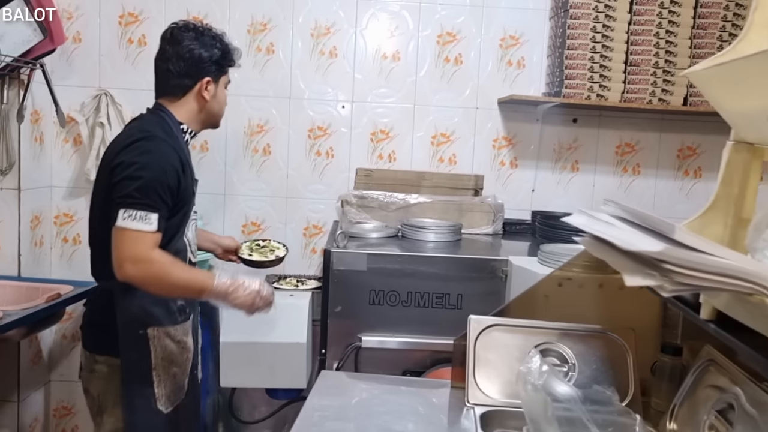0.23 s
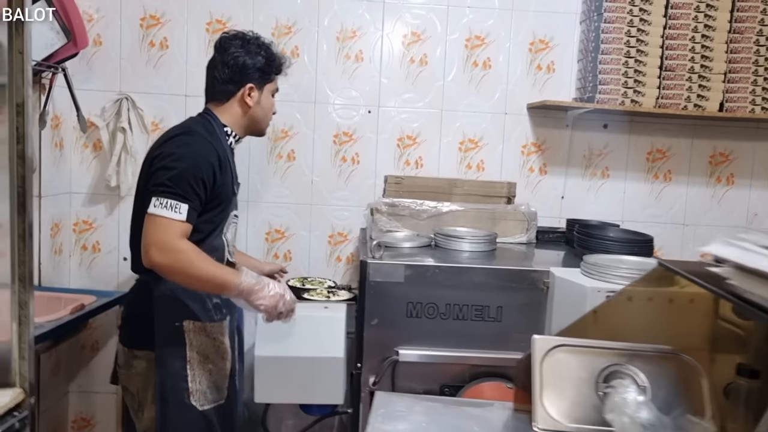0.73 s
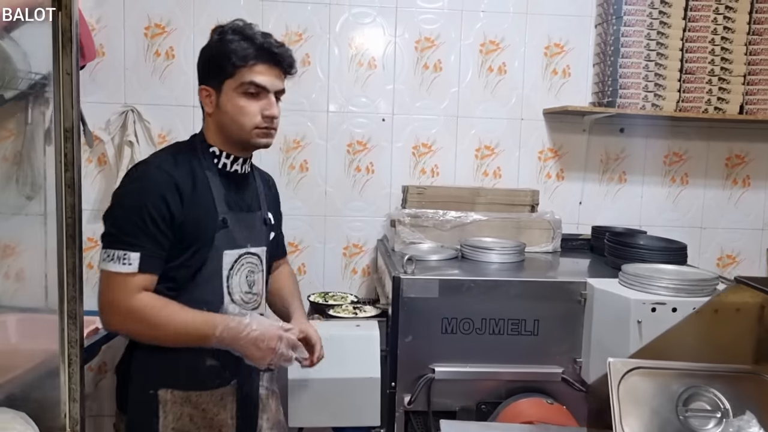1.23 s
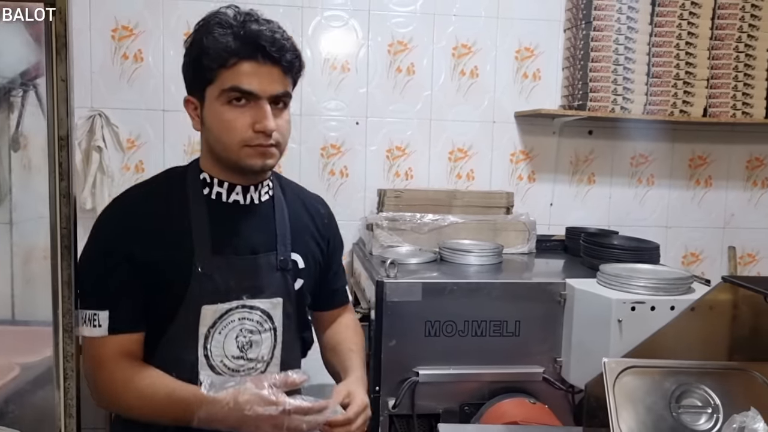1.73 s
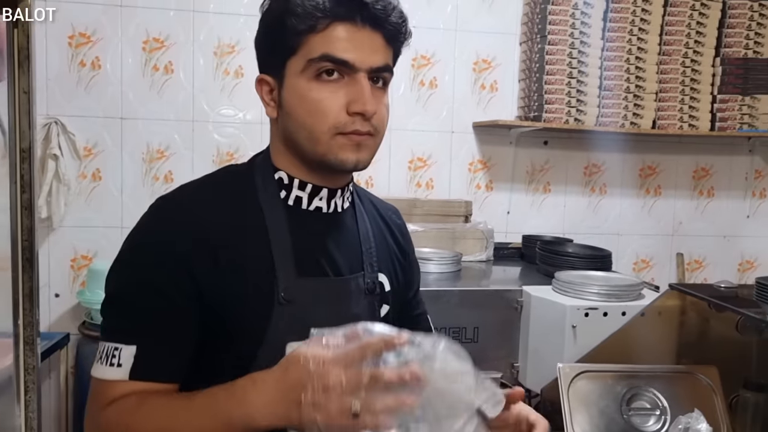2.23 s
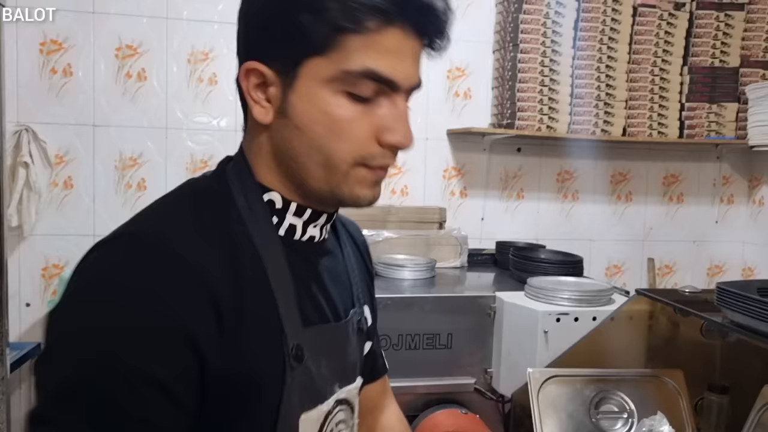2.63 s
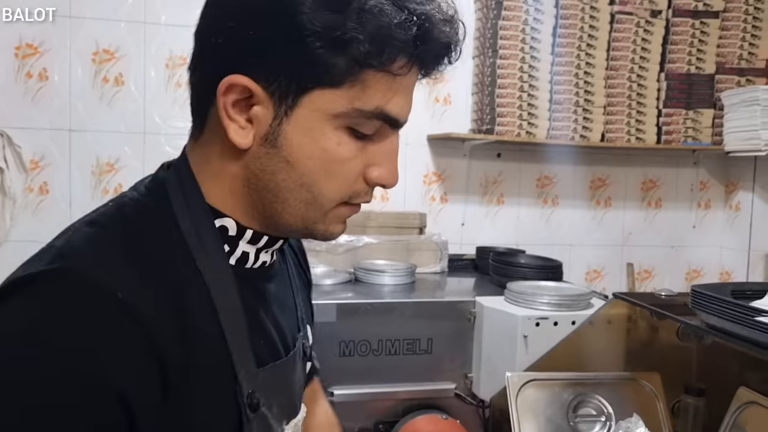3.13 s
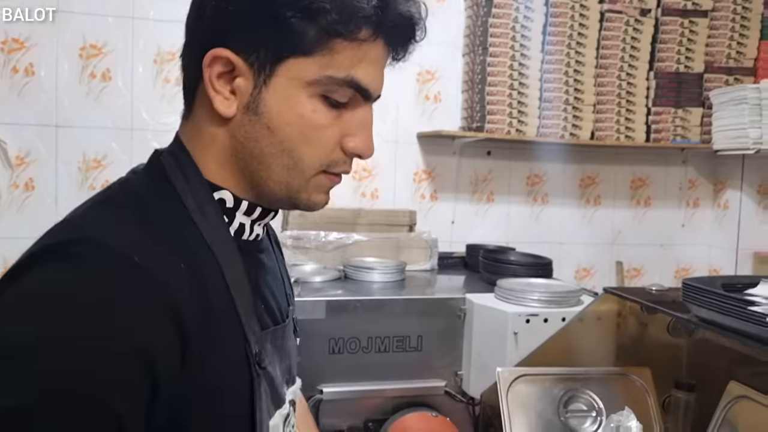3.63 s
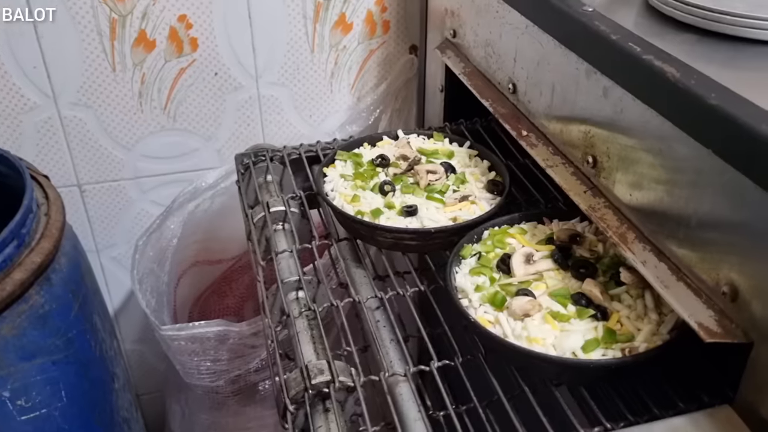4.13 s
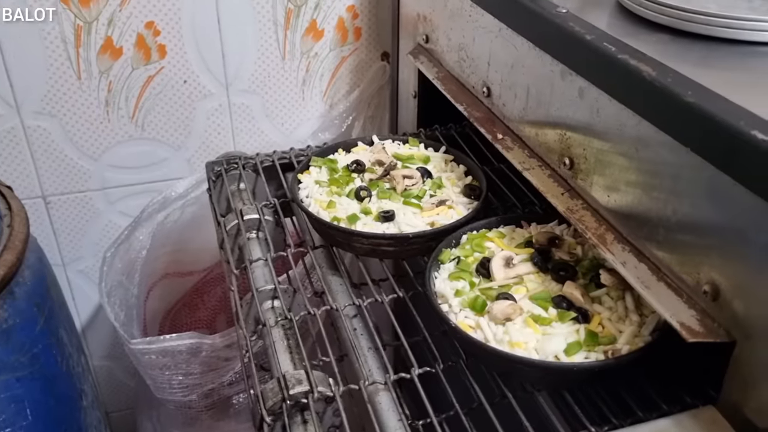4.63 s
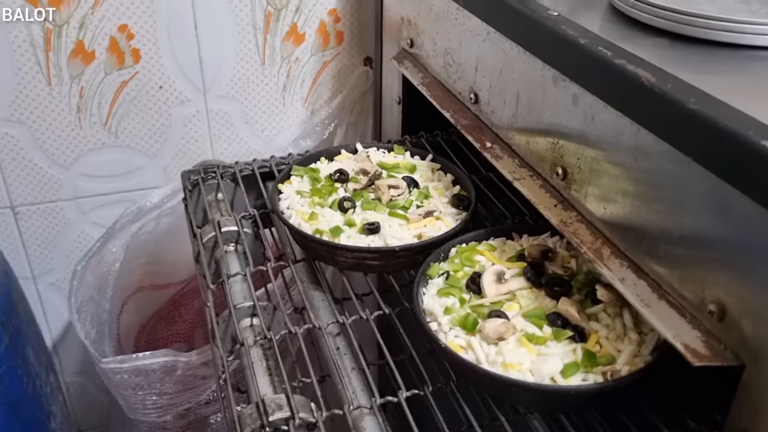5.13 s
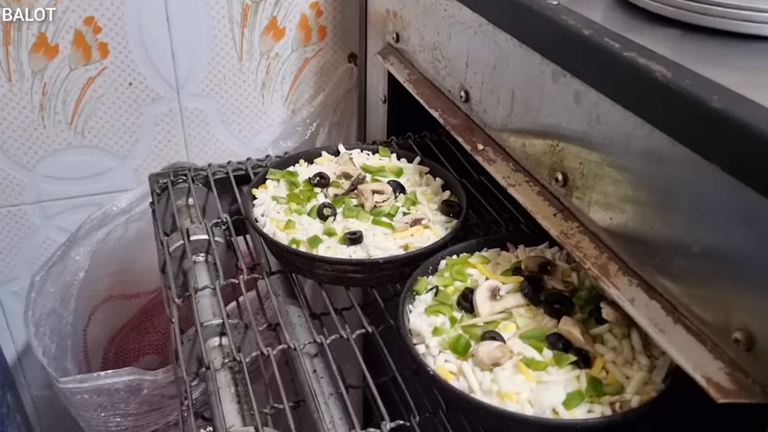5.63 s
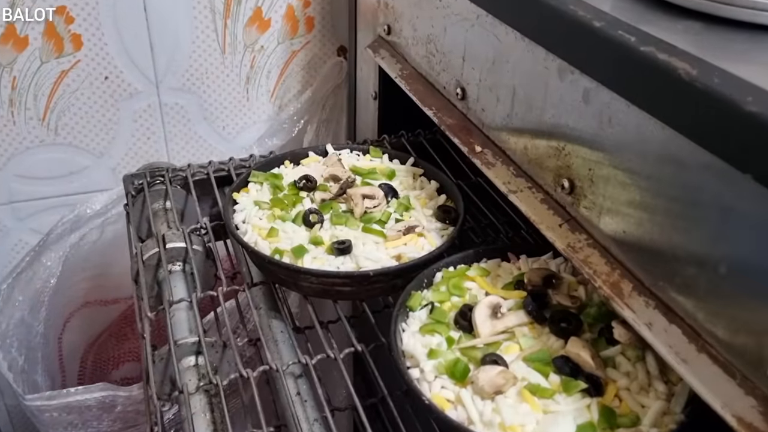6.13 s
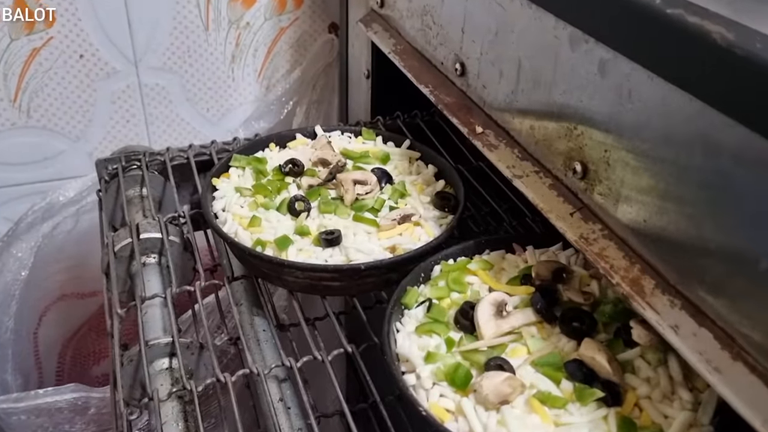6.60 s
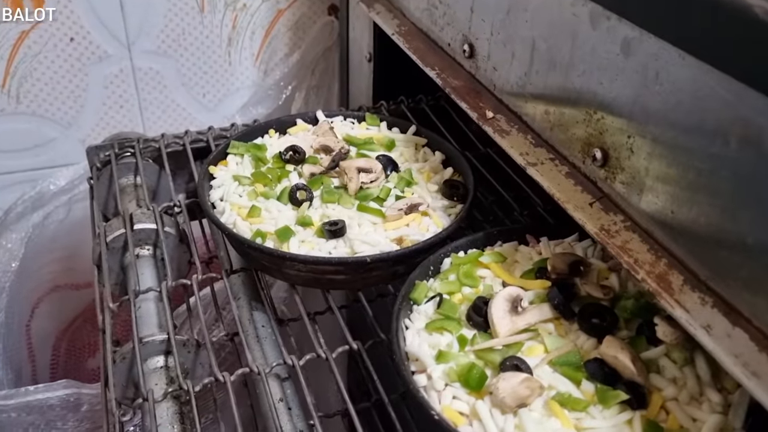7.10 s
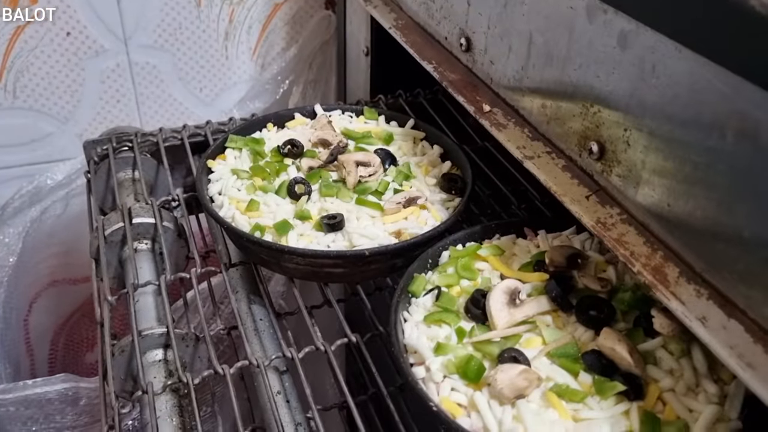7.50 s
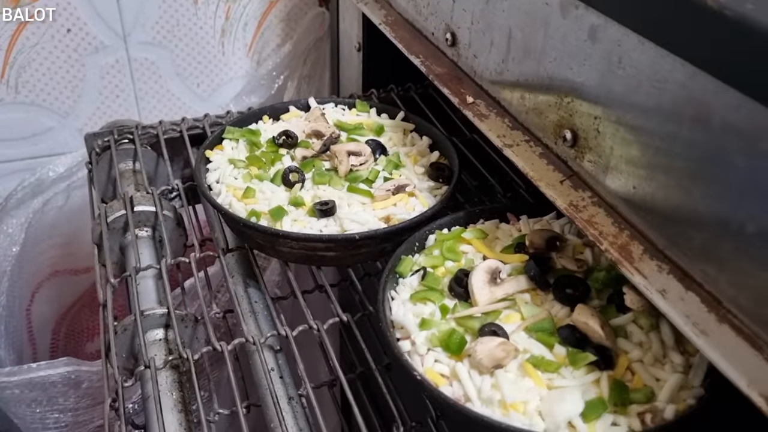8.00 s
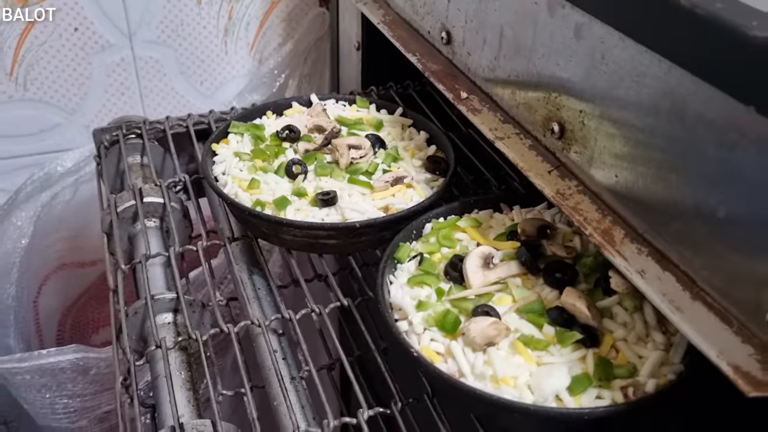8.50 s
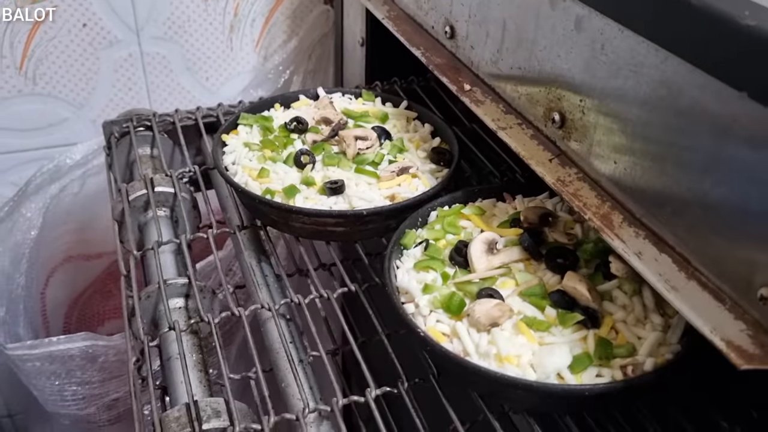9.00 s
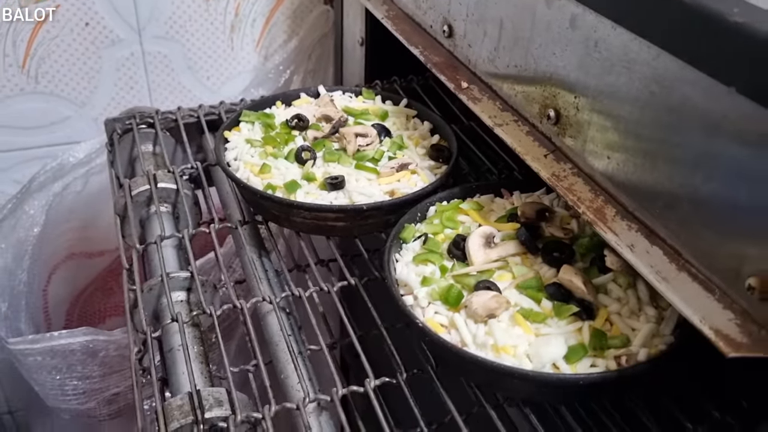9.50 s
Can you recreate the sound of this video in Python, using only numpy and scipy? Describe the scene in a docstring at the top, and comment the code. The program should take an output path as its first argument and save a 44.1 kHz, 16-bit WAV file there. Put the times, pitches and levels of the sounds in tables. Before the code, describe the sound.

In a tiled kitchen, a conveyor oven's blower gives a steady low rumble with rushing air and motor hum. Heard from across the room, thin plastic gloves rustle briefly, with one light tap. After a small dry click the microphone is at the oven mouth, where the rumble is fuller and the air slightly louder. Near the end, metal pans are knocked down twice, the second time with a deep thud.

```python
"""Conveyor oven in a tiled kitchen

Blower turbulence booms in the oven housing and roars out of it, under motor tones and a thin drive
whine. From across the room a cook is heard rustling plastic gloves. The listening place then jumps,
with a dry click, to the oven mouth, and two pans are knocked down somewhere behind."""
import sys
import numpy as np
from scipy import signal
from scipy.fft import rfft, irfft, next_fast_len
from scipy.io import wavfile
from scipy.ndimage import uniform_filter1d

SR = 44100
rng = np.random.default_rng(int(sys.argv[2]) if len(sys.argv) > 2 else 0)


def output_pcm(signal):
    """Save a mono or channel-first signal as 16-bit PCM at the path in sys.argv[1].

    Samples are clipped to [-1, 1] before scaling.
    """
    pcm = np.clip(np.atleast_2d(signal).T, -1, 1) * 32767
    wavfile.write(sys.argv[1], SR, np.round(pcm).astype(np.int16))


N = 429975
TIME = np.arange(N) / SR
JUMP_S = 3.845  # from across the room (far) to the oven mouth (near)
BAND_LIMIT_HZ = 15830


def blower_rumble():
    """Turbulence excites the oven housing, whose resonances shape it into a low rumble."""
    # spectra at the two places: (frequency [Hz], density [dB])
    far = [(12, -59), (25, -29), (50, -18), (70, -2.5), (91, -4.5), (111, -3), (129, -21), (152, -10),
           (195, -17.5), (240, -25), (255, -28.5), (330, -39), (500, -62)]
    near = [(12, -49), (25, -37), (50, -5.5), (65, -10.5), (91, -3), (118, -6.5), (135, -1), (160, -2.5),
            (200, -2.5), (215, -12.5), (252, -21), (330, -36), (500, -82)]
    # (time [s], level [dB])
    levels = [(0, -18.5), (1, -21.5), (1.8, -17.5), (2.6, -19), (3.84, -19), (3.85, -17.5), (6, -17.5),
              (7.4, -15.5), (8.7, -18), (9.75, -16.5)]
    noises = [stereo_noise(place, size=8192, patchy_db=0.43, flicker_db=-4) for place in (far, near)]
    return envelope(levels) * crossfade(*noises)


def air_roar():
    """Air rushing out of the housing radiates broadband flow noise; the stream is never quite even."""
    # spectra at the two places: (frequency [Hz], density [dB])
    far = [(150, -34), (260, -15), (304, 1.5), (361, -10), (400, 0.5), (536, -10.5), (682, -3.5), (782, -6),
           (1000, -8.5), (1730, -13), (2120, -13), (2350, -16.5), (3800, -20), (7300, -25), (16000, -24)]
    near = [(150, -23), (260, -1), (400, -0.5), (600, -9), (682, -5), (760, -6), (1000, -5.5), (1240, -11),
            (1850, -12), (2520, -20), (3800, -20), (4800, -22), (7300, -25.5), (16000, -26.5)]
    # (time [s], level [dB])
    levels = [(0, -37), (2.4, -37), (3.84, -37.5), (3.85, -34.5), (6, -34), (8.1, -35.5), (9.75, -35)]
    noises = [stereo_noise(place, size=1024, patchy_db=0.5, flicker_db=1.0) for place in (far, near)]
    flutter = gain_of(0.76 * drift(40))
    return envelope(levels) * flutter * balance(-2.5) * crossfade(*noises)


def housing_boom():
    """A randomly driven resonance of the housing booms on one note and throbs by chance."""
    # (time [s], level [dB])
    levels = [(0, -19), (.15, -16), (.6, -16), (1, -16.5), (1.4, -17.5), (2.1, -20.5), (2.4, -20),
              (2.55, -14), (2.95, -16), (3.2, -26.5), (3.5, -17), (3.85, -21), (4.3, -21.5), (5.1, -20),
              (5.8, -21), (6.6, -21.5), (6.83, -10), (7, -18.5), (7.3, -16), (7.9, -23), (8.3, -12),
              (8.6, -16), (8.85, -19), (9.3, -14.5), (9.39, -19), (9.55, -20.5), (9.75, -27)]
    far, near = (resonance(hz, width_hz=14.1, alike=0.98) for hz in (95.8, 92.26))
    return envelope(levels) * balance(0.8) * crossfade(far, near)


def blade_tone():
    """Periodic pressure pulses from the blades give a tone at the blade-passing frequency."""
    # (time [s], level [dB])
    levels = [(0, -32.5), (.55, -28.5), (.7, -50), (1.4, -57), (1.6, -28.5), (2.7, -28.5), (2.8, -42),
              (2.93, -28.5), (3.05, -43), (3.35, -34), (3.7, -30.5), (3.84, -32.5), (4.2, -28.5),
              (5.8, -36), (6.8, -38), (8, -53), (9.75, -27)]
    return envelope(levels) * tone(222.9, waver_hz=0.74, waver_db=1.0, phase_rad=0.05)


def deep_swell():
    """Narrow-band noise in the deepest bass slowly swells and recedes."""
    # (time [s], level [dB])
    levels = [(0, -35), (3.84, -36), (4.2, -32), (5, -25.5), (6.6, -24), (7.2, -36), (9.75, -30)]
    return envelope(levels) * resonance(53.5, width_hz=16, alike=0.92)


def duct_tones():
    """Resonances of motor and ducts give fuzzy tones, whose mix shifts as the listener leans in."""
    # (frequency [Hz], width [Hz], far level [dB], first near level [dB], last near level [dB])
    modes = [(132.3, 11.3, -31.5, -40, -30), (250.4, 8, -46, -56, -52), (321.9, 12, -54.5, -45, -53),
             (391.9, 20, -48, -50, -49), (521, 10.5, -56.5, -56, -52.5), (578.5, 12, -57, -56.5, -48),
             (677.2, 43, -47.5, -44, -50.5), (969.7, 37, -52.5, -48, -48), (2160, 1100, -62, -55, -56.5),
             (686.5, 12, -59, -49, -58), (784, 16, -70, -49.5, -59), (966, 5.9, -67, -57.5, -68),
             (1037, 11, -66, -57, -60), (1463, 16, -58.5, -60, -65.5)]
    out = np.zeros((2, N))
    for hz, width_hz, far_db, first_db, last_db in modes:
        near_db = np.interp(TIME, (JUMP_S, N / SR), (first_db, last_db))
        out += gain_of(np.where(TIME < JUMP_S, far_db, near_db)) * resonance(hz, width_hz, alike=0.89)
    return out


def slot_tone():
    """Passing rotor slots make a tone; modulation by the turning shaft adds sidebands."""
    # (time [s], level [dB])
    levels = [(0, -57), (1.15, -62), (1.35, -53), (2.1, -53.5), (2.4, -59), (2.9, -54.5), (3.84, -52.5),
              (3.86, -59.5), (9.75, -59)]
    # {offset from the slot tone [multiples of the shaft rate]: relative level [dB]}
    sidebands = {-1: -9.5, 0: 0, 2: -3.5, 3: -5, 4: -9.5}
    slot_hz, shaft_hz = 2045.5, 48.4
    lines = sum(gain_of(db) * tone(slot_hz + order * shaft_hz, waver_hz=.6, waver_db=1.2, phase_rad=.3)
                for order, db in sidebands.items())
    return envelope(levels) * lines


def drive_whine():
    """The motor drive radiates narrow spectral lines near 12 kHz in a haze of weak sidebands."""
    # (frequency [Hz], relative level [dB])
    lines = [(11736, -20), (11870, 2.5), (11935, -2), (12032, -21), (12075, -18), (12170, -20)]
    # (time [s], gain [dB])
    levels = [(0, -57), (2, -55.5), (3.84, -57), (3.86, -52.5), (5, -50.5), (5.6, -54.5), (6.3, -48.5),
              (7.3, -53.5), (8.5, -50), (9.75, -52)]
    haze = gain_of(6.5) * resonance(12000, width_hz=450, alike=.1)
    whine = sum(gain_of(db) * resonance(hz, width_hz=9.3, alike=.1) for hz, db in lines)
    return envelope(levels) * balance(-3) * (haze + whine)


def glove_rustles():
    """Thin plastic buckles in dense tiny snaps; the fold decides how low or high they sound."""
    # (peak time [s], rise [s], fall [s], mid level [dB], low band re mid [dB], high band re mid [dB])
    rustles = [(0.526, .012, 0.075, -33.5, -20, 11.5), (.572, 0.055, 0.079, -42, 10, 0),
               (0.617, 0.047, 0.082, -36, 1, 14), (1.56, .12, 0.17, -41.5, -2, 3),
               (1.92, 0.13, 0.55, -52, -11, 12), (2.125, .03, 0.23, -43, -12, 2),
               (2.2, 0.18, .2, -43, -7, 12), (2.3, 0.34, 0.19, -39, 0.5, -3), (2.52, .14, .1, -45.5, 0, 16),
               (2.615, 0.11, 0.1, -39.5, -4, 15), (2.77, 0.13, .2, -50, 2, 7)]
    fade_db, snaps_per_s = 20, 1500  # fade: drop one rise or fall time away from the peak
    power = np.zeros((3, N))
    for peak_s, rise, fall, db, low_db, high_db in rustles:
        away = np.where(TIME < peak_s, (peak_s - TIME) / rise, (TIME - peak_s) / fall)
        power += gain_of(db - fade_db * away + np.array([[low_db], [0], [high_db]])) ** 2
    sizes = gain_of(2.2 * rng.exponential(1, N)) * (rng.random(N) < snaps_per_s / SR)
    snaps = 2.0 + unit_rms(uniform_filter1d(sizes, size=24))  # half-millisecond bursts over a floor
    low, mid, high = (unit_rms(band(snaps * rng.standard_normal((2, N)), *edges_hz))
                      for edges_hz in ((900, 2860), (3000, 12000), (11000, 20000)))
    mid = unit_rms(mid + 0.7 * band(mid, 4200, 5470))  # the hollow of the glove favours one band
    return balance(-3) * sum(np.sqrt(p) * part for p, part in zip(power, (low, mid, high)))


def pan_knocks():
    """Impacts crack and excite a pan's damped modes; a structure-borne thud comes through the counter."""
    # knocks of pans and trays, and the click at the jump: (time [s], clatter level [dB], centre [Hz],
    # spread [octaves], t60 [s], crack gain [dB], thud level [dB], left minus right [dB])
    knocks = [(.569, -31.5, 1180, 0.11, 0.097, -55, -39, -5),
              (3.844, -52, 6000, 2.5, 0.0084, -36.5, -46, 1), (8.623, -35.5, 2150, 0.4, 0.12, -55, -42, 3),
              (8.8866, -19.5, 1500, 2, 0.17, -23.5, -19.5, 4.5),
              (9.3845, -30.5, 2500, 2, 0.4, -32, -33, 11), (9.393, -23.5, 2000, 1.2, 0.1, -24, -39, 0),
              (9.404, -22.5, 500, 1.2, 0.34, -45, -7.5, 2)]
    # (frequency [Hz], width [Hz], level [dB])
    pan_modes = [(290, 59, 14), (435, 68, 18), (800, 130, 2), (1385, 230, 2.5), (1870, 64, -1),
                 (2170, 51, 1), (2150, 50, -1), (3090, 17, 6), (4430, 100, -4), (5870, 140, -3),
                 (7800, 320, -5)]
    # (frequency [Hz], t60 [s])
    counter_modes = [(60, 0.25), (105, 0.89), (190, 0.091)]
    airborne, thuds, t = np.zeros((2, N)), np.zeros(N), np.arange(SR // 2) / SR
    hz = np.fft.rfftfreq(len(t), 1 / SR)
    response = 0.039 + sum(gain_of(db) / np.hypot(1, 2 * (hz - f) / width) for f, width, db in pan_modes)
    for start_s, db, centre_hz, octaves, t60, crack_db, thud_db, side_db in knocks:
        noise, grit = rng.standard_normal((2, len(t)))
        colour = response * np.exp(-.5 * (np.log2((hz + 1) / centre_hz) / octaves) ** 2)
        clatter = unit_rms(irfft(rfft(noise) * colour, len(t))) * gain_of(db - 60 * t / t60)
        crack = band(grit, 4800, 19000) * gain_of(crack_db - 60 * t / 0.036)
        thud = sum(gain_of(thud_db - 60 * t / mode_t60) * np.sin(2 * np.pi * f * t)
                   for f, mode_t60 in counter_modes)
        start = round(start_s * SR)
        airborne[:, start:start + len(t)] += balance(side_db) * (clatter + crack)[:N - start]
        thuds[start:start + len(t)] += thud[:N - start]
    return airborne, thuds


def reverberation(x):
    """Reflections off the tiles arrive as sparse echoes of random sign; each band decays at its own rate."""
    # (frequency [Hz], t60 [s])
    decay_times = [(200, 0.51), (1000, 0.3), (3000, 0.3), (8000, 0.3), (15000, 0.06)]
    taps = np.zeros((2, SR // 2))
    slots = np.arange(100, SR // 2 - 20, 20)  # one echo in every 20 samples
    arrivals = slots + rng.integers(0, 20, (2, len(slots)))
    np.put_along_axis(taps, arrivals, rng.choice([-1., 1.], arrivals.shape), 1)
    hz, t, spectra = signal.stft(taps, SR, nperseg=256)
    decay = gain_of(-60 * t / at_frequency(decay_times, hz)[:, None])
    tail = signal.istft(spectra * decay, SR, nperseg=256)[1]
    return signal.fftconvolve(x.mean(0)[None], tail / np.linalg.norm(tail[0]), axes=1)[:, :N]


def stereo_noise(spectrum, size, patchy_db, flicker_db):
    """Shaped noise, partly coherent between the channels, with drifting patches; the treble flickers."""
    # (frequency [Hz], left-right correlation [1])
    correlation = [(25, 1), (80, 1), (160, 1), (300, 0.87), (450, 0.71), (740, 0.41), (1100, 0.0031),
                   (1500, -0.48), (2200, -0.069), (15000, -0.027)]
    # (frequency [Hz], left minus right [dB])
    level_difference = [(25, 2), (80, -0.5), (160, 3), (270, 1.5), (740, 7.5), (1220, 4.5), (2010, 1),
                        (3330, 2), (5500, -2.5), (9080, 0.5), (15000, -2.5)]
    frames, hz = N * 4 // size + 9, np.fft.rfftfreq(size, 1 / SR)
    left_re, left_im, other_re, other_im, patches = rng.standard_normal((frames, len(hz), 5)).T
    patches = unit_rms(uniform_filter1d(uniform_filter1d(patches, size=10, axis=0), size=12, axis=1))
    alike = np.clip(at_frequency(correlation, hz), -1, 1)[:, None]
    left, other = left_re + 1j * left_im, other_re + 1j * other_im
    spectra = np.array([left, alike * left + np.sqrt(1 - alike ** 2) * other])
    spectra *= gain_of(at_frequency(spectrum, hz)[:, None] + patchy_db * patches)
    flicker = unit_rms(uniform_filter1d(rng.standard_normal(frames), size=3))
    spectra *= gain_of(flicker_db * np.outer(hz / BAND_LIMIT_HZ, flicker))
    spectra *= balance(at_frequency(level_difference, hz))[:, :, None]
    out = signal.istft(spectra, nperseg=size, noverlap=size * 3 // 4)[1][:, size:size + N]
    return out / np.sqrt(np.mean(out.mean(0) ** 2))


def resonance(hz, width_hz, alike):
    """Noise with left-right correlation `alike`, passed twice through a resonator of the given width."""
    pole = np.exp((2j * hz - width_hz) * np.pi / SR)
    noise = rng.standard_normal((2, N))
    noise[1] = alike * noise[0] + np.sqrt(1 - alike ** 2) * noise[1]
    return unit_rms(signal.lfilter([1], [1, -pole], signal.lfilter([1], [1, -pole], noise)).real)


def tone(hz, waver_hz, waver_db, phase_rad):
    """A sine under slow random modulation of frequency, level and left-right phase."""
    cycles = np.cumsum(hz + waver_hz * drift(6)) / SR
    phase_shift = np.outer([1, -1], phase_rad * drift(1.2))
    return np.sqrt(2) * gain_of(waver_db * drift(8.6)) * np.sin(2 * np.pi * cycles + phase_shift)


def drift(top_hz):
    """Sines of random phase add up to a slow fluctuation of rms 1."""
    t = np.arange(0, N / SR + .1, .005)
    rates_hz = np.geomspace(top_hz / 20, top_hz, 24)
    slow = sum(np.sin(2 * np.pi * (f * t + rng.random())) / np.sqrt(f) for f in rates_hz)
    return np.interp(TIME, t, unit_rms(slow))


def crossfade(far, near):
    """Equal-power crossfade of 6 ms at the jump."""
    angle = np.clip((TIME - JUMP_S) / .006 + .5, 0, 1) * np.pi / 2
    return np.cos(angle) * far + np.sin(angle) * near


def at_frequency(points, hz):
    """Interpolation on a log-frequency axis."""
    f, value = np.transpose(points)
    return np.interp(np.log(hz + 1), np.log(f + 1), value)


def envelope(levels):
    """Gain at each sample from rows of (time [s], level [dB])."""
    return gain_of(np.interp(TIME, *np.transpose(levels)))


def balance(db):
    """Channel gains for a level difference, left minus right."""
    return gain_of(np.outer([.5, -.5], db))


def band(x, lo_hz, hi_hz):
    return signal.sosfilt(signal.butter(2, [lo_hz, hi_hz], "band", fs=SR, output="sos"), x)


def gain_of(db):
    return 10 ** (np.asarray(db) / 20)


def unit_rms(x):
    return x / np.sqrt(np.mean(x ** 2) + 1e-20)


def scene():
    """Superposition of oven, gloves and pans; gloves and airborne knocks also reverberate."""
    clatter, thuds = pan_knocks()
    gloves = glove_rustles()
    oven = blower_rumble() + air_roar() + housing_boom() + blade_tone() + deep_swell()
    oven += duct_tones() + slot_tone() + drive_whine()
    echoes = gain_of(-5.5) * (reverberation(gloves) + reverberation(clatter))
    return oven + gloves + clatter + thuds + echoes


def record(dry):
    """The microphone's response falls below 45 Hz and above 8 kHz; a steep low-pass limits the band."""
    # (frequency [Hz], gain [dB])
    response = [(20, -28), (45, -1.5), (7600, 0.5), (8800, -10), (11000, -15), (12600, -14.5),
                (16000, -13.5)]
    pad = 4096
    padded = np.pad(dry, ((0, 0), (pad, pad)), "reflect", reflect_type="odd")
    size = next_fast_len(N + 3 * pad)
    gains = gain_of(at_frequency(response, np.fft.rfftfreq(size, 1 / SR)))
    heard = irfft(rfft(padded, size) * gains, size)
    low_pass = signal.firwin(1023, BAND_LIMIT_HZ, window=("kaiser", 9), fs=SR)
    return signal.oaconvolve(heard, low_pass[None], "same", axes=1)[:, pad:pad + N]


dry = scene()
out = record(dry)
output_pcm(out)
```